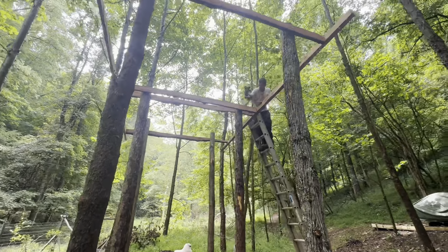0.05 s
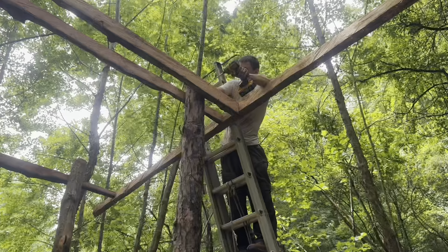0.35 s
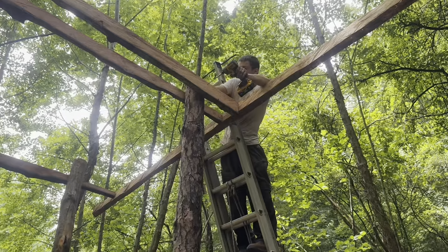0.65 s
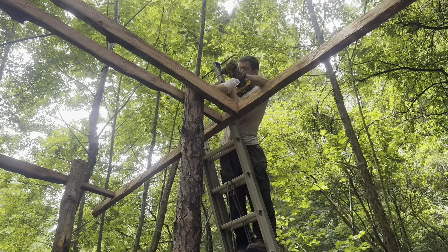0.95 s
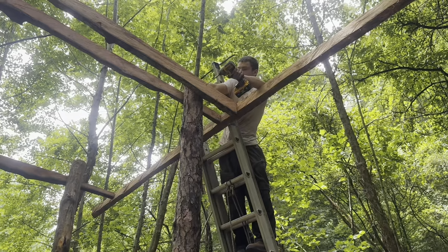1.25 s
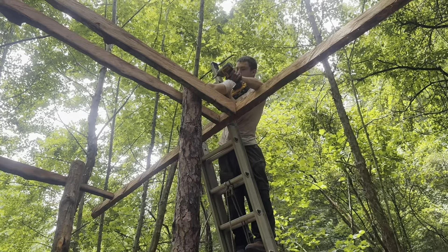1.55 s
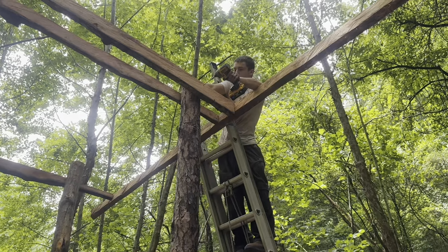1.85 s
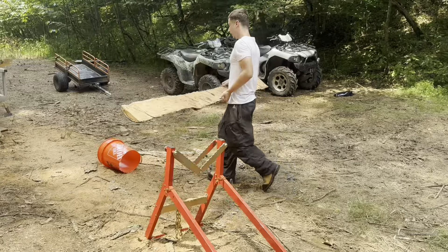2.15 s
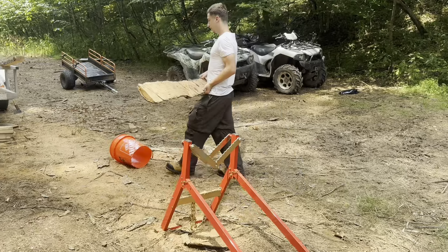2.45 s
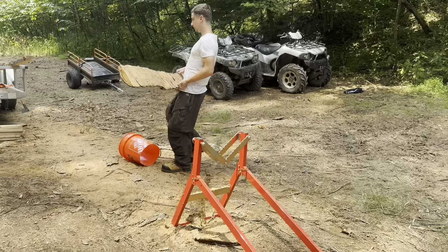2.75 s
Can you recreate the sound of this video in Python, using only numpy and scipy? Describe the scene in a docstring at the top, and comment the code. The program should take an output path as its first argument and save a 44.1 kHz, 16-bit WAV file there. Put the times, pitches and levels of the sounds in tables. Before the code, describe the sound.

A soft hush of leaves opens the scene outdoors, heard on a phone's stereo microphone. At about 0.3 seconds an impact driver starts close by, hammering a screw into timber with a loud, very fast metallic rattle and a gear whine. It cuts off abruptly at 2 seconds, and the background changes to an open yard with a faint generator droning far away. A few soft boot steps land on dirt, slightly left. At about 2.8 seconds a boot kicks an empty plastic bucket with a hollow boom. The bucket lands, skids and clatters over grit, loudest around 3.2 seconds, then tumbles away with weaker taps until about 3.9 seconds. Boots step and scuff on the sandy ground between 4 and 5.4 seconds, with small clicks. Around 5.5 seconds a wooden board bumps down twice in quick succession amid a gritty scrape.

```python
"""Impact driver and kicked bucket

A woodland building site, on a phone's stereo microphone. In front, an impact driver hammers a long
screw into a timber frame, about 47 blows a second. Then, abruptly, a dirt yard with a generator far
off: a boot kicks an empty plastic bucket, whose wall, base and air ring as it lands, skids and
tumbles away. Boots scuff the gritty ground and a board bumps down twice."""
import sys
import numpy as np
from scipy import signal
from scipy.fft import rfft, irfft, next_fast_len
from scipy.io import wavfile
from scipy.ndimage import uniform_filter1d, map_coordinates

SR = 44100
rng = np.random.default_rng(int(sys.argv[2]) if len(sys.argv) > 2 else 0)


def int16_out(signal):
    """Quantize to a 16-bit WAV file."""
    q = np.round(np.clip(np.atleast_2d(signal).T, -1, 1) * 32767)
    wavfile.write(sys.argv[1], SR, q.astype(np.int16))


N = 252693
TIME = np.arange(N) / SR
DRIVER_ON, FIRST_BLOW, YARD_ON, KICK_AT, DRAG_AT = .2995, .2932, 2.003, 2.8365, 5.42  # s

# Noise colours: (frequency [Hz], relative density [dB])
WOODS_AIR = [(18, -41), (30, -20), (60, -2), (150, -15.5), (537, -8.5), (883, -10), (3360, -11.5),
             (5990, -7), (15800, -40)]
YARD_AIR = [(15, -47), (25, -49), (59, 2.5), (102, -8.5), (113, -6), (152, -10.5), (216, -8.5),
            (382, -12.5), (414, -10.5), (672, -18.5), (729, -22), (857, -8.5), (955, -16), (3130, -21.5),
            (6000, -24), (9000, -33.5), (15800, -34.5)]
SAND_HISS = [(1000, -18), (3000, -11), (6000, 1), (9000, -4), (12000, 5), (15800, 3.5)]
SOLE_KNOCK = [(150, -15), (350, 0.5), (600, -4.5), (800, -5.5), (1200, -7), (2500, -57)]
SOLE_SCUFF = [(500, 16), (1100, 13), (2700, 12), (4000, 7.5), (7000, -17)]
GRIT_HISS = [(1500, -7), (3500, -4.5), (6500, -1), (9000, -18.5), (12500, -7.5), (15800, -22)]
GEAR_WHIRR = [(150, -17.5), (400, -15.5), (900, -13), (1600, -5), (1900, -6), (2500, -2), (2900, -7.5),
              (3300, 1), (3900, -8.5), (4800, -3), (6500, -4), (7200, -2), (7750, -12), (8300, -6),
              (9000, -6), (9800, -13), (15500, -22.5)]
STEEL_TICK = [(1500, -39), (4000, 4.5), (7300, 1), (9200, 5), (10700, 2.5), (11300, 3), (12200, 3),
              (14400, 2.5), (15800, 0.5)]
# Stereo width at the microphone: (frequency [Hz], left-right likeness [-1..1])
GROUND_ALIKE = [(100, 0.86), (350, 0.1), (800, 0.019), (2500, 0.17), (6000, 0.094)]
BUCKET_ALIKE = [(100, 0.96), (350, 0.94), (700, -0.18), (1100, -0.27), (2200, 0.95), (3500, 0.67),
                (6000, -0.053)]
DRIVER_ALIKE = [(100, 0.96), (300, 0.95), (700, 0.52), (1500, 0.19), (3100, 0.09), (7000, 0.0039),
                (8800, -0.91), (11000, -0.13)]
# Balance at the microphone: (frequency [Hz], left minus right [dB])
BUCKET_SIDE = [(100, 3), (350, 1.5), (650, 3), (1000, 12), (1600, -1), (6000, 2.5)]
DRIVER_SIDE = [(60, 4), (110, 0.5), (200, 3), (380, 5.5), (700, 3), (1290, 4), (2380, -2), (4400, 0.5),
               (8120, 1.5), (15000, -1)]

# Faint tones far into the woods: (frequency [Hz], level [dB], t60 [s])
FAR_TONES = [(795, -57.5, 0.78), (650, -53, 0.16), (570, -64, 0.97)]
# The distant generator: (frequency [Hz], level [dB])
GENERATOR_TONES = [(59.2, -78), (91.5, -70), (150.7, -56), (209.9, -58.5), (689.1, -65.5), (834.4, -82),
                   (893.6, -64.5)]
# Sand spraying under sole or rim: (time [s], level [dB], t60 [s])
SAND_BURSTS = [(2.831, -24, 0.015), (2.85, -48, 0.22), (2.911, -47, .025), (3.264, -26, 0.044),
               (3.276, -25.5, 0.072), (3.3, -46, 0.55), (3.428, -38.5, 0.088), (3.442, -43.5, 0.39),
               (4.128, -37.5, 0.052), (4.16, -31, .033), (4.389, -41, .033), (5.027, -34, 0.07),
               (5.291, -40.5, .033), (5.443, -27, 0.021), (5.497, -18.5, 0.023), (5.51, -40.5, 0.17),
               (5.6, -35, .012), (5.618, -39, 0.29), (5.673, -28, .025)]
# Timber, rim and stones: (time [s], level [dB], pitch [Hz], width [Hz], t60 [s])
CLACKS = [(1.6805, -8.5, 1700, 1900, 0.021), (1.691, -18, 1400, 700, 0.018),
          (2.832, -11.5, 3560, 3040, 0.018), (2.91, -32, 7000, 7000, 0.012),
          (2.911, -17, 2380, 2200, 0.013), (2.988, -34, 1500, 900, 0.079), (3.119, -6, 1130, 350, 0.025),
          (3.12, -9, 1490, 320, 0.041), (3.228, -11, 1780, 600, 0.049), (3.254, -16, 1730, 350, 0.05),
          (3.183, -7, 2100, 900, .03), (3.277, -16, 2260, 1200, 0.028), (3.466, -22, 4500, 3500, 0.014),
          (3.692, -27.5, 852, 130, 0.092), (3.588, -31.5, 930, 300, 0.067), (3.691, -32, 3480, 4010, .018),
          (3.742, -33, 846, 79.3, 0.072), (4.128, -29, 6350, 160, 0.061), (4.12, -35, 2400, 2500, .025),
          (4.159, -27, 1900, 1300, 0.028), (4.183, -31, 5040, 2500, .022), (4.195, -37, 1900, 1400, 0.13),
          (4.241, -33, 2200, 2600, 0.028), (4.413, -38, 1590, 1200, 0.018), (4.567, -32, 940, 597, 0.043),
          (4.992, -33.5, 3320, 2000, 0.049), (5.017, -36.5, 2510, 130, 0.18),
          (5.027, -31, 3000, 700, 0.041), (5.019, -33, 3230, 810, 0.072), (5.034, -27, 4100, 2200, 0.028),
          (5.094, -32.5, 3180, 2200, 0.05), (5.429, -36, 2700, 1800, 0.019), (5.441, -31, 1440, 200, 0.092),
          (5.443, -24.5, 3080, 1800, 0.025), (5.455, -29, 2600, 3500, .018), (5.442, -32, 1670, 200, 0.057),
          (5.443, -32.5, 736, 300, 0.11), (5.6, -32, 4500, 5000, .012), (5.617, -33, 5000, 5000, .012),
          (5.67, -33, 3500, 900, 0.035)]
# Boots landing: (time [s], thud [dB], pitch [Hz], knock over thud [dB], scuff over thud [dB])
FOOTFALLS = [(2.063, -33, 300, -6, -32), (2.366, -40, 248, -9, -10), (2.684, -34.5, 150, -7, -25),
             (2.873, -26.5, 220, -12, -22), (3.321, -21.5, 255, -8, -9), (4.191, -30, 330, -4, -18),
             (4.574, -40, 333, 1, -6), (5.018, -24.5, 188, -6, -0.5), (5.176, -37, 60.6, -2.5, -20)]
# Soles scraping: (time [s], knock [dB], scuff over knock [dB], grit over knock [dB])
SCRAPES = [(4.005, -55.5, -8, 5.5), (4.157, -32.5, -7, -7), (4.184, -29.5, -10.5, -24),
           (4.24, -34, -7, -16), (4.972, -44.5, 1, -14), (4.99, -42.5, 0, -11), (5.009, -39, 0.5, -4),
           (5.429, -39, 3.5, -4), (5.498, -35.5, 2, -2.5), (5.6, -42, -3, 0)]
# The board landing: (time [s], thump [dB], pitch [Hz], knock over thump [dB])
BOARD_BUMPS = [(5.503, -24, 151, -1), (5.5417, -23, 116, -2)]

# Bucket contacts: (time [s], wall [dB], hollow over wall [dB], grit over wall [dB], skid [s])
LANDINGS = [(2.831, -20, -8, -17, 0), (2.851, -22, 0.5, -14, .02), (2.906, -26.5, -13, -11, 0),
            (3.115, -20, -8, -11, 0), (3.155, -17, -1.5, -7, 0), (3.164, -12.5, -2.5, -5, .02),
            (3.178, -13.5, -7.5, -9.5, .08), (3.226, -25.5, 1, -14, .02), (3.264, -17, -8.5, -8, .045),
            (3.319, -26.5, -0.5, -18, .02), (3.435, -26, -10.5, -9, .02), (3.467, -26.5, -8, -13, .02),
            (3.492, -30.5, -2, -13, 0), (3.585, -35.5, -2, -15, 0), (3.6, -37.5, -5, -21, 0),
            (3.661, -41.5, -6, -25, 0), (3.69, -30.5, -4, -16, 0), (3.712, -40, 0, -18, 0),
            (3.741, -36, -16, -5, 0), (3.763, -37, -11, -6.5, .02), (3.86, -47, -1.5, -2, .06)]
# Its plastic wall and hollow base: (frequency [Hz], width [Hz], relative level [dB])
WALL_PEAKS = [(866, 86, -2), (1013, 24, 3), (1044, 320, -4.5), (1350, 110, -0.5), (1445, 40, -6.5),
              (1710, 100, -6), (1857, 48, -3.5), (2225, 190, -2.5), (2510, 140, -7), (2800, 150, -11),
              (3130, 160, -10.5)]
BASE_PEAKS = [(387, 98, -3), (305, 100, -5.5), (170, 85, -13), (667, 170, -10.5)]
# The base under the boot: (frequency [Hz], t60 [s], relative level [dB])
KICK_MODES = [(309.3, 0.086, -9.5), (345, 0.06, -14), (595, 0.071, -17.5), (646, 0.032, -7),
              (728, 0.016, -2.5), (174, 0.072, -16), (102, 0.11, -22.5), (1350, 0.092, -23),
              (2170, 0.12, -25)]
# The air inside: (time [s], pitch [Hz])
AIR_PITCH = [(2.83, 295.3), (2.9, 315), (3.16, 335), (3.2, 366.7), (3.25, 380), (3.35, 386.6), (3.8, 372.3)]

# The driver's gears: (frequency at full rate [Hz], level [dB])
GEAR_TONES = [(1484, -47), (1552, -51.5), (1597, -42), (1665, -49.5), (1708, -48), (3138, -41),
              (3252, -44.5), (3405, -57)]
# Its hammer: (time [s], rate [blows/s])
HAMMER_RATE = [(0.29, 44.15), (0.45, 44.78), (0.75, 46.93), (0.9, 47.83), (1.1, 47.93), (1.35, 47.4),
               (1.5, 46.82), (1.7, 47.34), (2.01, 47.84)]
# How hard the screw bites: (time [s], ring level [dB])
BITE = [(0.3, -14.5), (0.34, -15.5), (0.52, -17.5), (0.96, -17.5), (1.38, -16), (1.44, -22), (1.6, -20.5),
        (1.75, -19.5), (2.0, -18)]
# Square or glancing blows, over the bite: (time [s], socket [dB], screw [dB], bit [dB])
ODD_BLOWS = [(.338, 3, 5, -1), (.361, 0, -2, -5), (.383, -1, -4, 2.5), (.406, 5.5, -2, 1),
             (.428, 3, 5, -0.5), (.473, 1, 0, -8), (.517, -2, 5.5, -2), (.561, 3.5, 3.5, 1.5),
             (.583, -1.5, 5, 1.5), (.605, -3, 6.5, -12), (.648, 4.5, 3, 3), (.692, 2, 2.5, 1),
             (.734, -6, 2, 2.5), (.756, -2.5, 5.5, -6), (.777, 4, -2, 0.5), (.819, 4, -4, 0),
             (.84, -10, -9, -16), (.862, 4.5, 6.5, -15), (.924, -0.5, -4, -3), (.945, 1, 1, 6),
             (.966, 0.5, -5, 9.5), (1.008, -2, -8, -4), (1.029, 3, -0.5, -1), (1.05, 0.5, 0, 6),
             (1.112, 2.5, 0, 2), (1.175, -0.5, -2, 4), (1.196, 0.5, 5, -4), (1.238, 2, 2, -5),
             (1.301, 0.5, 0, -3), (1.364, -0.5, -1, 3.5), (1.428, -8, -6, -2), (1.513, 2, 5, 1),
             (1.662, 4.5, -2, 1), (1.767, 6, -6, 1), (1.788, 3.5, 3, 5), (1.872, 5.5, 3, 1),
             (1.935, -1, 2, 5), (1.977, -5, -3, -1), (1.998, 3.5, -9, 4)]
# Struck timber and steel: (frequency [Hz], decay [s], relative level [dB])
BOARD_MODES = [(238, 0.0033, -5), (570, 0.0017, -3.5), (742, 0.0034, -4), (1070, 0.0013, -20),
               (1330, 0.0053, -18)]
BEAM_MODES = [(98, 0.0067, -33.5), (140, 0.0063, -37), (196.5, 0.0062, -34.5), (353.4, 0.0092, -31),
              (428, 0.012, -44), (620, 0.0039, -28), (753, 0.012, -35.5), (1266, 0.0034, -19.5),
              (1580, 0.0087, -27), (1646, 0.0035, -29)]
SOCKET_MODES = [(1165, 0.0015, -15), (1346, 0.0016, -14), (2210, 0.00093, -4.5), (2517, 0.0013, -1.5),
                (3150, .0007, -43)]
SCREW_MODES = [(4660, 0.0014, -3.5), (5240, 0.0013, -7)]
BIT_MODES = [(5800, 0.0012, -0.5), (6470, 0.00094, -7.5), (7840, 0.0012, -11.5)]
ANVIL_MODES = [(1603, 0.0076, -26.5), (3400, 0.0012, -12.5), (3650, 0.00032, -11.5), (4710, 0.0007, -10),
               (5060, 0.0011, -12), (6480, 0.0011, -18.5), (8000, 0.00033, -11.5)]
SOFT_ANVIL_MODES = [(1630, 0.0034, -27.5), (3187, 0.002, -16.5), (3520, 0.00097, -17), (6150, .0008, -20)]


def amp(db):
    """Decibels to gain."""
    return 10 ** (np.asarray(db) / 20)


def unit(x):
    """Scaled to rms 1."""
    return x / np.sqrt(np.mean(x ** 2) + 1e-20)


def along(points, hz):
    """Read (frequency, value) points on a log axis."""
    f, v = np.transpose(points)
    return np.interp(np.log(hz + 1), np.log(f + 1), v)


def curve(points, times=TIME):
    """Read (time, value) points at these times."""
    return np.interp(times, *np.transpose(points))


def wobble(rate):
    """A smooth random curve, rate knots a second."""
    return map_coordinates(rng.standard_normal(4000), [TIME * rate], mode="mirror")


def filtered(x, response):
    """x times a response of frequency."""
    m = next_fast_len(N + SR // 4)
    return irfft(rfft(x, m) * response(np.fft.rfftfreq(m, 1 / SR)), m)[..., :N]


def white():
    """Two unrelated white noises."""
    return rng.standard_normal((2, N))


def noise(spectrum):
    """Two unrelated noises of rms 1 with this spectrum."""
    return unit(filtered(white(), lambda hz: amp(along(spectrum, hz))))


def resonate(x, peaks):
    """x through (frequency [Hz], width [Hz], level [dB]) resonances; white noise keeps its power."""
    def response(f):
        body = sum((-1) ** k * amp(db) * 1j * f * width / (hz * hz - f * f + 1j * f * width)
                   for k, (hz, width, db) in enumerate(peaks))
        return body / np.sqrt(np.mean(np.abs(body) ** 2))
    return filtered(x, response)


def blend(pair, alike):
    """Two unrelated signals become left and right with a given likeness."""
    turn = lambda hz: np.arccos(np.clip(along(alike, hz), -1, 1)) / 2
    mid, side = filtered(pair, lambda hz: np.array([np.cos(turn(hz)), np.sin(turn(hz))]))
    return np.array([mid + side, mid - side])


def lean(x, balance):
    """Tilt each frequency towards the left or right."""
    return filtered(x, lambda hz: amp(np.outer([.5, -.5], along(balance, hz))))


def lay(times, shapes):
    """Add one row of samples at each time."""
    at = np.round(np.asarray(times) * SR).astype(int)[:, None] + np.arange(shapes.shape[1])
    return np.bincount(np.clip(at, 0, N).ravel(), shapes.ravel(), N + 1)[:N]


def fades(times, db, t60, attack):
    """An envelope that rises at each time and falls 60 dB in t60 seconds."""
    t = np.arange(SR // 3) / SR
    shape = amp(db[:, None] - 60 * t / np.reshape(t60, (-1, 1))) * (1 - np.exp(-t / attack))
    return np.sqrt(lay(times, shape ** 2))


def swell(t, decay):
    """A soft rise to 1 after decay seconds, then an exponential fall."""
    return t / decay * np.exp(1 - t / decay)


def ring(times, gains, modes, scatter_db, loose, apart, detune=.006):
    """Blows ring modes; phase scatters from blow to blow (loose) and from left to right (apart)."""
    t = np.arange(int(SR * min(.06, 9 * max(m[1] for m in modes)))) / SR
    crest_s = .001  # the modes add up this far into the blow
    out = np.zeros((2, len(times), len(t)))
    for hz, decay, db in modes:
        size, phase, side, sharp = rng.standard_normal((4, len(times), 1))
        angle = 2 * np.pi * hz * (1 + detune * sharp) * (t - crest_s)
        shift = np.sqrt(hz / 1000) * (loose * phase + apart * np.array([side, -side]))
        gain = gains[:, None] * amp(db + scatter_db * np.minimum(size, 1.3))
        out += gain * swell(t, decay) * np.sin(angle + shift)
    return np.array([lay(times, side) for side in out])


def outdoors(x, t60, dull_hz):
    """Scattered echoes from trunks and vehicles; the treble dies sooner."""
    hz, t, spectrum = signal.stft(rng.standard_normal((2, SR // 2)), SR, nperseg=256)
    life = t60 / (1 + hz[:, None] / dull_hz)
    shape = amp(-60 * t / life) * np.minimum(t / 0.0052, 1) * (hz / (hz + 250))[:, None]
    tail = signal.istft(spectrum * shape, SR, nperseg=256)[1]
    return signal.fftconvolve(x, tail / np.linalg.norm(tail[0]), axes=1)[:, :N]


def woods():
    """Leaves hush all around; faint tones die away in the distance."""
    leaves = amp(-54.5) * blend(noise(WOODS_AIR), GROUND_ALIKE)
    return leaves + sum(amp(db - 60 * TIME / t60) * np.sin(2 * np.pi * hz * TIME + 0.5 * wobble(25))
                        for hz, db, t60 in FAR_TONES)


def yard():
    """A generator drones far off under the open air, a little to the left."""
    air = amp(-47.5 + 0.097 * wobble(8.1)) * blend(noise(YARD_AIR), GROUND_ALIKE)
    drone = sum(amp(db + 1.8 * wobble(3.83)) * np.sin(2 * np.pi * hz * TIME + 0.22 * wobble(6))
                for hz, db in GENERATOR_TONES)
    return (air + drone) * amp([[.7], [-.7]])


def sand(attack_s=0.034, grain_hz=12800, width_hz=6400):
    """Grains burst brightly; late on, sand hisses and catches under a sliding sole."""
    slide = amp(-50 + 4.5 * wobble(520) + 0.66 * wobble(18))
    slide *= np.clip((TIME - DRAG_AT) / attack_s, 0, 1)
    s, db, t60 = np.transpose(SAND_BURSTS)
    bursts = fades(s, db, t60, attack=0.0019) * white()
    return slide * noise(SAND_HISS) + resonate(bursts, [(grain_hz, width_hz, 0)])


def clacks():
    """Each hard little contact around the site rings one short, rough resonance."""
    out = np.zeros((2, N))
    t = np.arange(SR // 5) / SR
    for s, db, hz, width_hz, t60 in CLACKS:
        peak = signal.iirpeak(hz, hz / width_hz, SR)
        hiss = rng.standard_normal((2, len(t) + 2000))
        band = signal.lfilter(*peak, signal.lfilter(*peak, hiss))[:, -len(t):]
        shape = amp(-60 * t / t60) * (1 - np.exp(-t / 0.0021))
        burst = unit(band * shape) * np.sqrt(np.mean(shape ** 2))
        out += [lay([s], amp(db) * side[None]) for side in burst]
    dry = blend(out, GROUND_ALIKE)
    return dry + amp(-8) * outdoors(dry, t60=0.26, dull_hz=7000)


def crunch(clump_db):
    """Sand grains: hiss broken into millisecond clumps."""
    clumps = unit(uniform_filter1d(rng.standard_normal(N), size=50))
    return unit(noise(GRIT_HISS) * amp(clump_db * clumps))


def sole(s, knock_db, scuff_db, grit_db, t60):
    """A sole on dirt gives a knock, a scuff and a spray of grit."""
    knock = fades(s, knock_db, t60, attack=0.00063) * noise(SOLE_KNOCK)
    scuff = fades(s, scuff_db, t60, attack=0.00047) * noise(SOLE_SCUFF)
    grit = fades(s, grit_db, t60, attack=0.00035) * crunch(clump_db=4.5)
    return blend(knock + scuff + grit, GROUND_ALIKE)


def boots():
    """Left of centre, short footfalls carry a low thud; scrapes last longer and have none."""
    s, db, thud_hz, knock_db, scuff_db = np.transpose(FOOTFALLS)
    t = np.arange(SR // 8) / SR
    cycles = thud_hz[:, None] * t  # a deeper thud lasts longer
    thud = lay(s, amp(db)[:, None] * swell(cycles, 0.68) * np.sin(2 * np.pi * cycles))
    steps = thud + sole(s, db + knock_db, db + scuff_db, grit_db=db - 17, t60=0.074)
    s, db, scuff_db, grit_db = np.transpose(SCRAPES)
    dry = steps + sole(s, db, db + scuff_db, db + grit_db, t60=0.28)
    echo = amp(-23.5) * outdoors(dry, t60=0.17, dull_hz=6150)
    return lean(dry + echo, [(200, 0.75), (700, 5.0), (2000, 1.8)])


def board():
    """A board bumps down twice in the yard: a woody knock, then a deep thump of a few cycles."""
    s, db, thump_hz, knock_db = np.transpose(BOARD_BUMPS)
    t = np.arange(SR // 8) / SR
    thump = lay(s, amp(db)[:, None] * swell(t, 0.0049) * np.sin(2 * np.pi * thump_hz[:, None] * t))
    dry = thump + ring(s - .002, amp(db + knock_db), BOARD_MODES, scatter_db=5, loose=0.59, apart=.5)
    return (dry + amp(-8) * outdoors(dry, t60=0.78, dull_hz=6000)) * amp([[1.1], [-1.1]])


def bucket_contacts(chatter_s=0.0172, jitter=0.33, fade_db_per_s=89):
    """A skidding rim catches again and again: times, then wall, hollow and grit levels."""
    start, level, hollow_db, grit_db, skid_s = np.transpose(LANDINGS)[..., None]
    catch = np.arange(8)
    slip, force = rng.standard_normal((len(LANDINGS), 2, len(catch))).transpose(1, 0, 2)
    skidding = catch > 0
    after = chatter_s * (catch + jitter * slip * skidding)
    heard = chatter_s * catch <= skid_s
    db = level - fade_db_per_s * after + skidding * (2 * force - 2.5)
    return [column[heard] for column in (start + after, db, db + hollow_db, db + grit_db)]


def bucket_air(s, db):
    """The air inside hums at each contact; the note rises as the mouth swings clear of the ground."""
    phase = 2 * np.pi * np.cumsum(curve(AIR_PITCH)) / SR + 0.55 * wobble(60)
    return fades(s, db, t60=0.15, attack=0.0044) * np.sin(phase)


def kick():
    """The bucket's base booms under the boot."""
    t = np.maximum(TIME - KICK_AT, 0)
    boom = sum(amp(db - 60 * t / t60) * np.sin(2 * np.pi * hz * t) for hz, t60, db in KICK_MODES)
    return boom * (1 - np.exp(-t / 0.003))


def bucket(t60=0.094):
    """Kicked away from the microphone, it rattles, sounds hollow and grinds sand at every contact."""
    s, wall_db, hollow_db, grit_db = bucket_contacts()
    wall = resonate(fades(s, wall_db, t60 * 1.01, attack=0.00095) * white(), WALL_PEAKS)
    base = resonate(fades(s, hollow_db - 1, t60, attack=0.00045) * white(), BASE_PEAKS)
    grit = fades(s, grit_db, t60, attack=0.00063) * crunch(clump_db=2.5)
    dry = blend(wall + base + grit, BUCKET_ALIKE) + amp(1.5) * kick() + bucket_air(s, hollow_db - 2)
    echo = outdoors(filtered(dry, lambda hz: hz / (hz + 250)), t60=0.87, dull_hz=7500)
    return lean(dry + amp(-11) * echo, BUCKET_SIDE)


def gear_whine(cycles, full_rate=47.4, wind_up_depth=0.17):
    """Gear tones follow the motor's speed, waver, and swell as the hammer winds up for each blow."""
    tones = sum(amp(db + 1.1 * wobble(7.2))
                * np.sin(2 * np.pi * hz * cycles / full_rate + 0.66 * wobble(14))
                for hz, db in GEAR_TONES)
    return tones * (1 - wind_up_depth * np.cos(2 * np.pi * cycles))


def driver(first_flight_s=.0078, second_flight_s=.0053, sag_db_per_s=2):
    """Up front, each blow ticks, rings socket, screw and bit, shakes the beam and bounces twice."""
    cycles = np.cumsum(curve(HAMMER_RATE) * (TIME >= FIRST_BLOW)) / SR
    count = int(np.interp(YARD_ON, TIME, cycles)) + 1
    late, force, bounce, bounce_force = rng.standard_normal((4, count))
    blows = np.interp(np.arange(count) + 1e-6, cycles, TIME) + .00015 * late
    # the force varies, and so does the share of socket, screw and bit
    strength_db = -0.8 + 1.8 * force[:, None] + 1.1 * rng.standard_normal((count, 3))
    for s, *db in ODD_BLOWS:
        strength_db[np.argmin(np.abs(blows - s))] = db
    part_gains = amp(curve(BITE, blows) + strength_db.T)
    steel = sum(ring(blows - .001, gains, modes, scatter_db=1, loose=.4, apart=.33)
                for gains, modes in zip(part_gains, (SOCKET_MODES, SCREW_MODES, BIT_MODES)))
    # the hammer bounces less as the screw sinks
    rebound_db = -10 - sag_db_per_s * (TIME - DRIVER_ON)
    recoil = amp(np.interp(blows, TIME, rebound_db) + 0.44 * bounce_force)
    rebounds = blows + first_flight_s + .0005 * bounce
    anvil = ring(rebounds, recoil, ANVIL_MODES, scatter_db=3, loose=0.49, apart=0.41)
    anvil += ring(rebounds + second_flight_s, recoil, SOFT_ANVIL_MODES,
                  scatter_db=0, loose=0.46, apart=0.42)
    beam = ring(blows, amp(-13.5 + force), BEAM_MODES, scatter_db=3, loose=0.41, apart=0.7)
    # steel meets steel just before the socket rings
    t = np.arange(SR // 80) / SR
    tick_gain = amp(-18.5 + strength_db.mean(axis=1))[:, None]
    ticks = lay(blows - .0026, tick_gain * swell(t, 0.0014))
    ticks += lay(rebounds - .0016, tick_gain * amp(-14.5) * swell(t, 0.0013))
    # the gears rattle hardest at each rebound
    rattle = lay(rebounds, recoil[:, None] * amp(-8.5) * swell(t, 0.00022))
    whirr = (amp(rebound_db - 14.5 + wobble(40.04)) + rattle) * noise(GEAR_WHIRR)
    tool = steel + anvil + beam + gear_whine(cycles)
    tool += blend(ticks * noise(STEEL_TICK) + whirr, DRIVER_ALIKE)
    tool = filtered(tool, lambda hz: 1 - np.exp(-(hz / 65) ** 2))  # a small tool radiates no deep bass
    running = curve([(DRIVER_ON, 0), (DRIVER_ON + .001, 1), (YARD_ON, 1), (YARD_ON + .004, 0)])
    return lean(tool, DRIVER_SIDE) * running


def scene():
    """The microphone is first by the driver in the woods, then in the yard."""
    foreground = driver() + bucket() + boots() + board() + clacks() + sand()
    return foreground + np.where(TIME < YARD_ON, woods(), yard())


def record(dry, top_hz=15950, edge_hz=70):
    """The phone keeps nothing above its band limit."""
    return filtered(dry, lambda hz: (1 - np.tanh((hz - top_hz) / edge_hz)) / 2)


dry = scene()
out = record(dry)
int16_out(out)
```